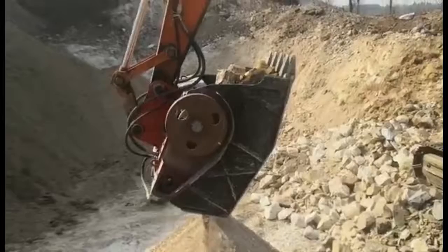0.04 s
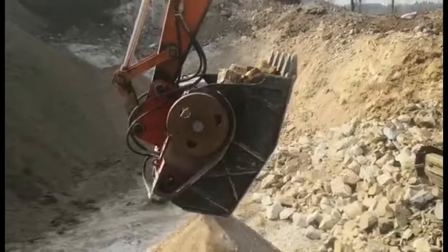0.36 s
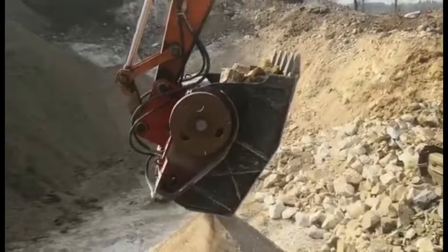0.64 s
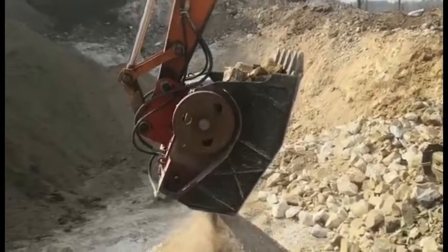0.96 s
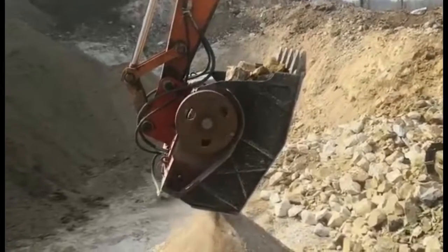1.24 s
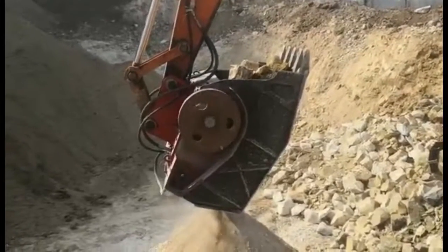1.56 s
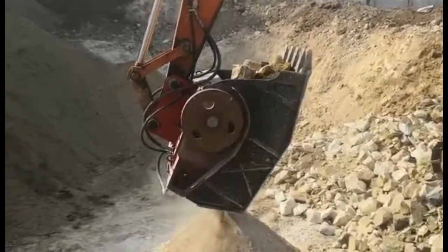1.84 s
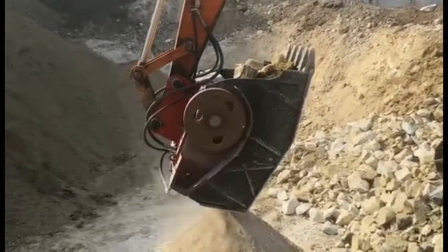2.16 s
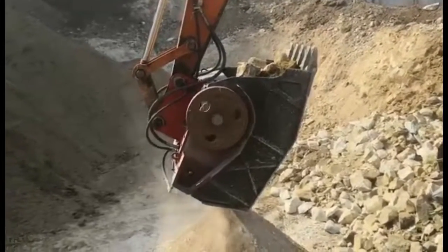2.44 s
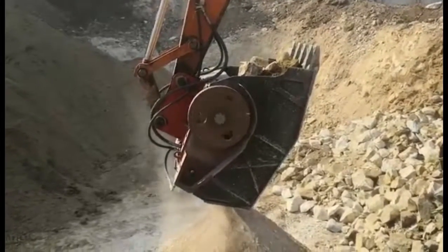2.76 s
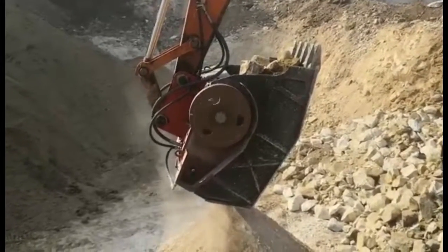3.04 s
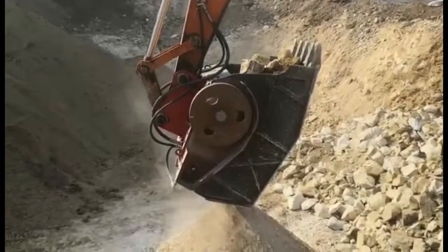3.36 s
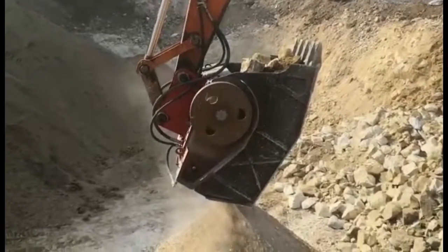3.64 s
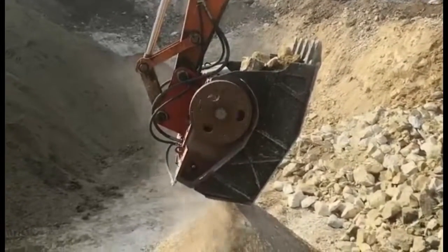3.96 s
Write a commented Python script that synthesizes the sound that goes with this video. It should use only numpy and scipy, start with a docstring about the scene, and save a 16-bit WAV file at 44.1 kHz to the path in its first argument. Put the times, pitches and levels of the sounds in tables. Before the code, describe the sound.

An excavator's crusher bucket crunches rock in fast, even strokes, with sharp splintering and ringing steel. Big lumps thud inside, mostly early on, while a diesel engine hums underneath. The open quarry adds a brief echo.

```python
"""Rock crusher in a quarry

The jaws of an excavator's crusher bucket chew rock, about 6.5 strokes a second. Each stroke crunches
and splinters stone against ringing steel; big lumps thud in the bucket's shell, mostly early on.
The diesel engine and the hydraulic drive hum underneath, and the quarry banks echo briefly."""
import sys
import numpy as np
from scipy import signal
from scipy.fft import rfft, irfft, next_fast_len
from scipy.io import wavfile
from scipy.ndimage import uniform_filter1d, map_coordinates

SR = 44100
rng = np.random.default_rng(int(sys.argv[2]) if len(sys.argv) > 2 else 0)


def store_pcm(level_fs):
    """Save levels as 16-bit WAV."""
    pcm = np.round(np.clip(level_fs, -1, 1) * 32767).astype(np.int16)
    wavfile.write(sys.argv[1], SR, np.atleast_2d(pcm).T)


N = 176400

# jaw strokes: t/s, crunch hold/s, crunch level/dB, splinter delay/s, splinter hold/s,
# splinter level/dB, clang level/dB, rumble level/dB
STROKES = [(0.074, 0.065, -23, 0.0018, 0.058, -35, -18, -15.5),
           (0.253, 0.048, -19, 0.0024, 0.039, -27, -21, -15),
           (0.381, 0.076, -18.5, -0.00063, 0.052, -28, -21.5, -19),
           (0.544, 0.053, -18.5, -0.004, 0.059, -31, -22.5, -14.5),
           (0.704, 0.07, -18.5, -0.0027, 0.05, -27.5, -23, -15.5),
           (0.865, 0.043, -19, 0.00032, 0.042, -28.5, -27, -18),
           (1.017, 0.049, -18.5, -0.0085, 0.06, -26.6, -17.5, -14.5),
           (1.17, 0.066, -18, -0.0059, 0.059, -29.9, -30, -18),
           (1.359, 0.028, -17, -0.017, 0.046, -28.5, -16.5, -27),
           (1.5, 0.057, -20.5, 0.036, 0.027, -33.5, -22.5, -22.5),
           (1.665, 0.044, -13.5, -0.011, 0.031, -29, -16, -21),
           (1.819, 0.039, -18, 0.0032, 0.039, -31.5, -23.5, -21.5),
           (1.972, 0.057, -18.5, 0.0034, 0.04, -31.5, -23.5, -36.5),
           (2.119, 0.056, -17, 0.0083, 0.041, -30.5, -19, -38),
           (2.291, 0.041, -16, -0.011, 0.05, -33.5, -41.5, -26),
           (2.441, 0.027, -16.9, -0.00071, 0.034, -29.5, -23, -22.5),
           (2.595, 0.028, -14.5, -0.02, 0.055, -33, -17, -20),
           (2.749, 0.04, -17.5, -0.01, 0.058, -33.5, -44, -20),
           (2.901, 0.018, -12.5, -0.0047, 0.014, -21, -49, -41),
           (3.062, 0.031, -13.5, -0.015, 0.032, -27.5, -21.5, -26.5),
           (3.213, 0.021, -15.5, -0.0013, 0.041, -29.5, -23.5, -19.5),
           (3.37, 0.032, -19.5, -0.0066, 0.034, -32, -36.5, -23.5),
           (3.519, 0.018, -17, -0.0099, 0.048, -34, -42, -24.5),
           (3.668, 0.028, -13.5, -0.022, 0.045, -30.5, -22, -24.4),
           (3.802, 0.019, -15, -0.017, 0.052, -32, -21, -18.5),
           (3.951, 0.062, -18.5, -0.0013, 0.033, -31.5, -24, -22.5)]
TIMES, HOLD, CRUNCH_DB, CHIP_DELAY, CHIP_HOLD, CHIP_DB, CLANG_DB, RUMBLE_DB = np.transpose(STROKES)
# tone of crunching stone: f/Hz, level/dB
CRUNCH_TONE = [(250, -25), (450, -8.5), (800, -2.5), (980, -11), (1230, 1.5), (1550, -3), (1900, 2),
               (2200, -1), (2400, -4.5), (2650, -2), (3000, -14), (4000, -21), (6000, -28.5), (10000, -77)]
# tone of splintering stone: f/Hz, level/dB
SPLINTER_TONE = [(1500, -16), (3000, 3), (4100, 3), (4700, -2.5), (5400, 3), (5950, 1.5), (6250, -5),
                 (6900, 1.5), (7330, 5.5), (7850, 10), (8250, -9), (8600, -0.5), (9050, -9.5), (9400, -14),
                 (10000, -65)]


def crunch(force):
    """Squeezed stone breaks in many tiny cracks; the treble slowly rises and falls."""
    # treble boost or cut: t/s, level/dB
    brightness = [(0, 2), (.5, -4), (1.099, 1), (1.5, -2), (2, -2.5), (2.5, -0.5), (3.1, 1.5), (3.45, 4.5),
                  (3.8, -1), (4, -3)]
    cracks = grains(colour(CRUNCH_TONE), rate=1300, scatter_db=4.5, life_s=0.0027)
    grind = amp(-3) * unit(patchy(cracks, depth_db=4))
    stone = force * (grind + amp(-7.5) * ticks(colour(CRUNCH_TONE), rate=350, scatter_db=2.5))
    treble = filtered(stone, lambda hz: 1 - 1 / (1 + (hz / 1500) ** 10))
    return stone + treble * (amp(np.interp(clock(), *np.transpose(brightness))) - 1)


def jaw_ring(force):
    """Grinding makes the steel jaws ring, faintly even between strokes."""
    # ringing notes: f/Hz, width/Hz, level/dB
    jaw_notes = [(1178, 10, -14), (1220, 15, 6.5), (1443, 22, 5.5), (1710, 22, 4.5), (1820, 15, 10.5),
                 (1874, 16, 10), (2054, 12, 7.5), (2550, 23, 5.5)]
    return amp(-11) * driven(force + amp(-34), jaw_notes)


def splinters():
    """Each stroke sheds sharp chips and sets the jaw teeth ringing."""
    # ringing notes: f/Hz, width/Hz, level/dB
    tooth_notes = [(2970, 62, -3.5), (3256, 28, 2.5), (3720, 50, -0.5), (4070, 67, -1.5), (4780, 48, -3),
                   (5480, 46, -2), (5890, 77, 1), (6000, 77, 0), (6800, 80, -1), (7255, 47, 6.5),
                   (7340, 75, -0.5), (7840, 59, 5.5), (8670, 37, -22.5), (9040, 47, -9)]
    cracks = grains(colour(SPLINTER_TONE), rate=690, scatter_db=10, life_s=0.0021)
    chips = amp(-2.5) * unit(patchy(cracks, depth_db=7))
    teeth = amp(-7.5) * ticks(ringing(tooth_notes), rate=310, scatter_db=4)
    clicks = amp(-6.5) * ticks(colour(SPLINTER_TONE), rate=180, scatter_db=0)
    bursts = swells(TIMES + CHIP_DELAY, CHIP_HOLD, CHIP_DB, rise_s=0.0077, fall_s=0.013)
    return bursts * (chips + teeth + clicks)


def bucket():
    """Each stroke makes the steel plates clang and shakes the bucket into a rumble."""
    # ringing notes: f/Hz, width/Hz, level/dB
    plate_notes = [(666.3, 5.7, 6.5), (692.6, 5.6, 7), (727, 37, -5.5), (805, 62, 1), (860, 15, -2)]
    # the shaking bucket: f/Hz, level/dB
    rumble_tone = [(20, -30.5), (40, -17), (58, -2.5), (75, -12), (100, -8), (160, 5), (220, 1.5), (290, 6),
                   (370, -18.5), (600, -23), (1500, -61)]
    push = swells(TIMES - .006, 0.56 * HOLD, CLANG_DB, rise_s=0.0069, fall_s=0.045)
    shake = swells(TIMES - .008, HOLD, RUMBLE_DB, rise_s=0.019, fall_s=0.039)
    return amp(-4.5) * driven(push, plate_notes) + amp(-3.5) * shake * rush(colour(rumble_tone))


def fractures():
    """Single stones give way with a bright snap or a heavy crack."""
    # bright snaps: t/s, level/dB
    snaps = [(0.258, -27), (0.532, -31), (0.851, -27), (1.041, -19), (1.163, -24.5), (1.509, -21.5),
             (1.821, -26), (1.98, -26), (2.285, -28), (2.132, -21), (2.311, -18), (2.443, -32),
             (2.748, -26), (2.904, -23), (3.044, -26), (3.214, -18.5), (3.369, -28), (3.656, -27),
             (3.806, -28)]
    # heavy cracks: t/s, level/dB
    cracks = [(0.1, -16), (.425, -14.5), (0.53, -18), (0.85, -25.5), (1.164, -11.5), (1.822, -32.5),
              (2.11, -22), (2.445, -16.5), (3.369, -17.5), (3.808, -13), (3.828, -14.5)]
    times, db = np.transpose(snaps)
    bright = swells(times, .001, db, rise_s=0.00049, fall_s=0.0042) * rush(colour(SPLINTER_TONE))
    times, db = np.transpose(cracks)
    heavy = swells(times, 0.0064, db, rise_s=0.00064, fall_s=0.017) * rush(colour(CRUNCH_TONE))
    return bright + heavy


def clanks():
    """A stone knocks the steel and leaves a cluster of notes ringing briefly."""
    # knocks: t/s, level/dB, f/Hz, fade time/s
    knocks = [(.722, -24.5, 770, 0.047), (.858, -21, 1260, 0.015), (1.042, -28, 5810, .012),
              (1.043, -26.5, 7600, 0.012), (1.165, -18.5, 1950, .018), (1.506, -17, 668, 0.056),
              (1.508, -27, 7540, 0.0075), (1.822, -14.5, 880, 0.018), (2.132, -24, 790, 0.021),
              (2.311, -26.5, 4750, 0.014), (2.316, -23.5, 1880, 0.051), (2.76, -19, 2080, 0.028),
              (2.896, -27, 7410, .015), (3.361, -26.5, 7290, 0.008), (3.368, -13.5, 2600, 0.011),
              (3.515, -16, 2570, 0.01), (3.808, -15.5, 1220, .03)]
    # notes in one clank: pitch ratio, level/dB
    notes = [(0.921, -7), (0.966, 2.5), (0.998, 3), (1.03, -2.5), (1.109, -14), (1.659, -17)]
    out, t = np.zeros((2, N + SR)), np.arange(SR // 4) / SR
    for start, db, hz, fall in knocks:
        ring = sum(amp(level) * np.sin(2 * np.pi * (hz * ratio * t + rng.random((2, 1))))
                   for ratio, level in notes)
        shape = np.exp(-t / fall) * (1 - np.exp(-t / .001))
        out[:, round(start * SR):][:, :len(t)] += amp(db) * shape * ring
    return spread(out[:, :N])


def thuds():
    """A big lump makes the bucket's shell boom for a few vibrations."""
    # jolts at their loudest: t/s, level/dB, f/Hz
    lumps = [(.104, -15, 180), (0.268, -19.5, 223), (.38, -13.5, 181), (.399, -8.5, 213), (.43, -18, 246),
             (.535, -15, 181), (.556, -10.5, 189), (0.692, -20.5, 216), (.713, -12, 228), (0.746, -22, 248),
             (.777, -20, 248), (0.856, -10, 209), (0.874, -9.5, 202), (0.897, -20, 186), (1.01, -10.5, 257),
             (1.049, -13, 222), (1.082, -15.5, 229), (1.166, -22.5, 215), (1.186, -17, 198),
             (1.373, -20.5, 170), (1.512, -16.5, 240), (1.585, -23, 247), (1.677, -19.5, 213),
             (2.463, -17, 256), (2.738, -19.5, 221), (2.764, -19.5, 229), (2.799, -22, 223),
             (3.205, -15, 216.5), (3.666, -20, 202), (3.798, -19, 153), (3.815, -23, 244),
             (3.968, -23, 227)]
    # notes in one thud: pitch ratio, level/dB
    notes = [(.58, -4), (1.002, 4), (1.328, -7)]
    rise_s, fall_s = 0.012, 0.012
    out, t = np.zeros(N + SR), np.arange(-SR // 20, SR // 8) / SR
    shape = np.exp(-(np.minimum(t, 0) / rise_s) ** 2 - np.maximum(t, 0) / fall_s)
    for peak, db, hz in lumps:
        ring = sum(amp(level) * np.sin(2 * np.pi * (hz * ratio * t + rng.random()))
                   for ratio, level in notes)
        out[max(round(peak * SR) - SR // 20, 0):][:len(t)] += amp(db) * shape * ring
    return out[:N]


def machine():
    """Engine and pump hum in step with their shaft; the hydraulic drive whines."""
    # hum: multiple of the shaft speed, level/dB
    hum_notes = [(2, -50), (3, -46), (4, -43), (6, -41), (7, -37), (8, -40.5), (9, -36.5), (15.25, -48)]
    # whine: f/Hz, level/dB
    whine_notes = [(662, -43), (689, -43.5)]
    shaft_hz = 29.27 * (1 + 0.0048 * wobble(7.04))
    turns = np.cumsum(shaft_hz) / SR
    hum = sum(amp(db + 1.2 * wobble(13))
              * np.sin(2 * np.pi * (multiple * turns + rng.random()) + 0.71 * wobble(12))
              for multiple, db in hum_notes)
    whine = sum(amp(db + 1.9 * wobble(3.42)) * np.sin(2 * np.pi * hz * clock() + 0.78 * wobble(6))
                for hz, db in whine_notes)
    return np.sqrt(2) * (hum + whine)


def deep_rumble():
    """A very low rumble swells and sinks."""
    # its loudness: t/s, level/dB
    levels = [(0, -38), (.7, -34), (1.2, -45), (1.55, -35), (1.9, -38), (2.2, -54), (2.7, -46), (3.2, -46),
              (3.6, -48), (4, -45)]
    # its tone: f/Hz, level/dB
    tone = [(15, -14.5), (30, -8), (58, -5.5), (80, -4), (115, -3.5), (170, -23.5), (400, -62)]
    return amp(np.interp(clock(), *np.transpose(levels))) * rush(colour(tone))


def fan_and_sand():
    """The fan and falling sand make an unbroken, fluttering rush."""
    # its tone: f/Hz, level/dB
    tone = [(25, -28), (60, -21), (130, -2.5), (220, -1.5), (390, -9.5), (660, -7.5), (980, -14),
            (1230, -9), (1580, -11), (1880, -3), (2600, -17), (3200, -18), (4400, -33), (5650, -24),
            (6400, -31), (7630, -22.5), (8400, -47.5), (9700, -49)]
    return amp(-28 + 2.6 * wobble(9.6)) * unit(patchy(rush(colour(tone)), depth_db=3))


def quarry_echo(x):
    """The banks throw back a short, blurred echo with little bass."""
    t = np.arange(SR // 3) / SR
    tail = rng.standard_normal((2, len(t))) * amp(-60 * t / .22) * (t > .006)  # 60 dB down in 0.22 s
    echo = signal.fftconvolve(x, tail / np.linalg.norm(tail[0]), axes=1)[:, :N]
    return filtered(echo, colour([(250, -33), (600, 0)]))


def amp(db):
    """Turn decibels into a multiplier."""
    return 10 ** (np.asarray(db) / 20)


def unit(x):
    """Scale to an average power of 1."""
    return x / np.sqrt(np.mean(x ** 2) + 1e-20)


def along(points, hz):
    """Read between (f/Hz, value) points on a pitch scale."""
    freqs, values = np.transpose(points)
    return np.interp(np.log(hz + 1), np.log(freqs + 1), values)


def clock():
    """Time of each sample in seconds."""
    return np.arange(N) / SR


def wobble(rate):
    """A smooth curve through `rate` random values a second."""
    return map_coordinates(rng.standard_normal(4096), [clock() * rate], mode="wrap")


def filtered(x, response):
    """Turn each frequency in x up or down by response(hz)."""
    size = next_fast_len(N + SR // 2)
    return irfft(rfft(x, size) * response(np.fft.rfftfreq(size, 1 / SR)), size)[..., :N]


def colour(points):
    """A filter curve through (f/Hz, level/dB) points."""
    return lambda hz: amp(along(points, hz))


def ringing(notes):
    """A filter curve with a peak at each ringing note."""
    return lambda hz: sum(amp(db) * 1j * hz * width / (pitch ** 2 - hz ** 2 + 1j * hz * width)
                          for pitch, width, db in notes)


def spread(pair):
    """Two unrelated signals become a left and a right that are partly alike."""
    # how alike the ears are: f/Hz, likeness (1 = the same)
    likeness = [(200, 1), (320, 0.91), (570, 0.17), (990, 1), (1740, 0.9), (3000, 0.17), (5300, 0.27),
                (9000, 0.12)]
    turn = lambda hz: np.arccos(np.clip(along(likeness, hz), -1, 1)) / 2
    mid, side = filtered(pair, lambda hz: np.array([np.cos(turn(hz)), np.sin(turn(hz))]))
    return np.array([mid + side, mid - side])


def rush(response):
    """Stereo noise with the given tone."""
    return unit(spread(filtered(rng.standard_normal((2, N)), response)))


def random_hits(rate, scatter_db):
    """Spikes of random size, about `rate` a second."""
    return (rng.random(N) < rate / SR) * amp(scatter_db * np.clip(rng.standard_normal(N), -2, 2))


def grains(response, rate, scatter_db, life_s):
    """A stream of tiny cracks, each a fading puff of noise."""
    power = signal.lfilter([1], [1, -np.exp(-1 / (life_s * SR))], random_hits(rate, scatter_db) ** 2)
    return unit(spread(filtered(np.sqrt(power) * rng.standard_normal((2, N)), response)))


def ticks(response, rate, scatter_db):
    """Separate sharp taps of stone."""
    taps = random_hits(rate, scatter_db) * rng.choice([-1, 1], (2, N))
    return unit(spread(filtered(taps, response)))


def swells(times, holds, levels, rise_s, fall_s):
    """Loudness curve of events that each rise, hold and fall."""
    t = clock()[::8]
    age = t - np.asarray(times)[:, None]
    past_hold = np.maximum(age - np.reshape(holds, (-1, 1)), 0)
    shape = np.exp(np.minimum(age, 0) / rise_s - past_hold / fall_s)
    return np.interp(clock(), t, np.linalg.norm(amp(levels)[:, None] * shape, axis=0))


def patchy(x, depth_db):
    """Every stone has its own tone: random peaks and dips that last about a stroke."""
    spectrum = signal.stft(x, nperseg=1024)[2]
    patches = uniform_filter1d(rng.standard_normal(spectrum.shape[1:]), size=3, axis=0)
    patches = uniform_filter1d(patches, size=8, axis=1)
    return signal.istft(spectrum * amp(depth_db * unit(patches)), nperseg=1024)[1][:, :N]


def driven(force, notes):
    """Grinding feeds the steel's notes; they ring on after it eases."""
    steel = ringing(notes)
    gain = np.sqrt(np.mean(np.abs(steel(np.arange(SR // 2))) ** 2))
    return spread(filtered(force * rng.standard_normal((2, N)), steel)) / gain


def scene():
    """Mix it all: bass in the centre, middle pitches mostly right, treble mostly left."""
    # lean to one side: f/Hz, left minus right level/dB
    balance = [(600, -7.5), (940, -6.5), (1350, 1), (1850, -8.5), (2400, -6), (3200, 0), (4500, -1),
               (5900, 3.5), (7500, 7.5), (9300, -4.5)]
    force = swells(TIMES, HOLD, CRUNCH_DB, rise_s=0.016, fall_s=0.028)
    rock = crunch(force) + jaw_ring(force) + splinters() + bucket() + fractures() + clanks()
    mix = rock + amp(-7.5) * quarry_echo(rock) + thuds() + machine() + deep_rumble() + fan_and_sand()
    lean = lambda hz: amp(np.array([[1], [-1]]) * along([(430, 0)] + balance, hz) / 2)
    return filtered(mix, lambda hz: lean(hz) / np.sqrt(np.mean(lean(hz) ** 2, axis=0)))


def record(dry):
    """Start after a short silence, sway between the ears, round the peaks and cut the top treble."""
    start_s, sway_db, top_hz = .095, 0.82, 9650
    x = dry * np.clip((clock() - start_s) / .004, 0, 1)
    x = x * amp(sway_db / 2 * wobble(15) * np.array([[1], [-1]]))
    x = x / (1 + np.abs(x) ** 8) ** (1 / 8)
    return filtered(x, lambda hz: 1 / np.sqrt(1 + (hz / top_hz) ** 100))


dry = scene()
out = record(dry)
store_pcm(out)
```